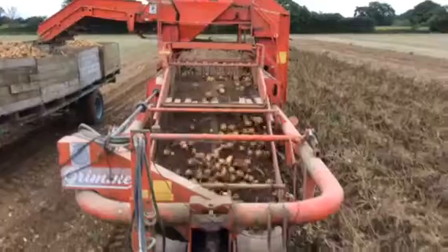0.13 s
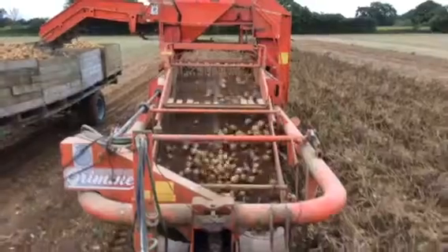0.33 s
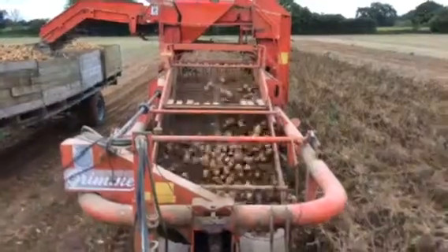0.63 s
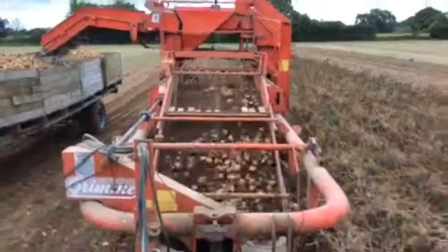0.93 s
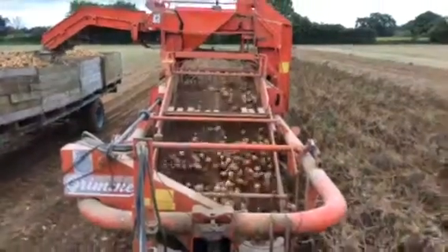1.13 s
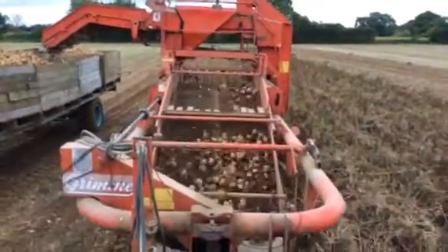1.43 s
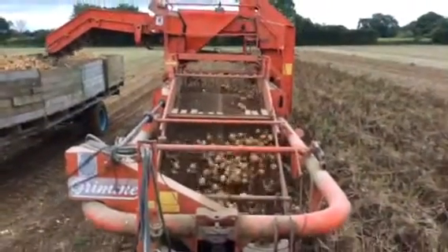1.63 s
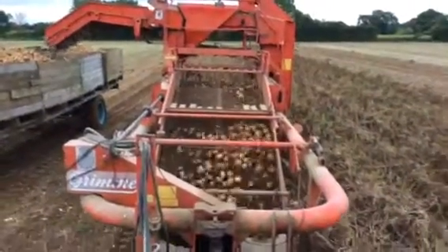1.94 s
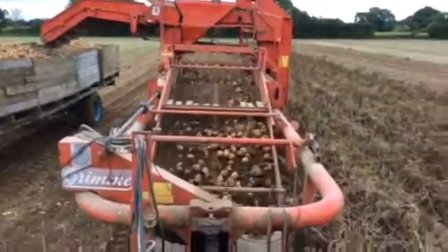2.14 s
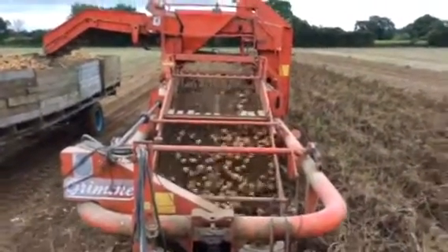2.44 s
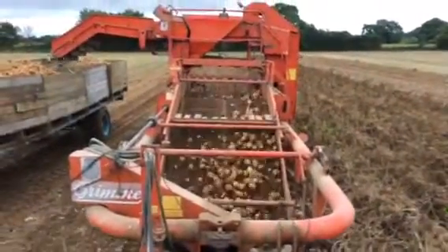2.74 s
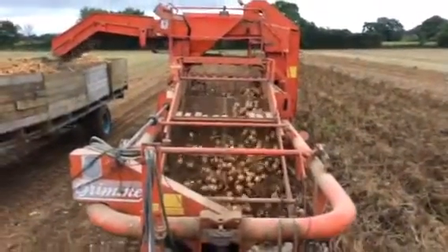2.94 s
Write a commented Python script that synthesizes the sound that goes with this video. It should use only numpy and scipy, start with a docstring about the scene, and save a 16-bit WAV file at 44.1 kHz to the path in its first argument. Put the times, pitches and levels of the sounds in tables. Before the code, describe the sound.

Potato harvester roaring steadily behind a tractor, with clattering stones, metallic clinks and soft thuds

```python
"""Potato harvester at work

A potato harvester behind a tractor works a field, heard from the tractor, abruptly after a short silence. The
diesel is a sum of firing orders beside a second engine's tone; gears are a clear sine and fuzzy tones, among
which a few blurred higher firing orders of the diesel also sound. Fans, webs and soil are shaped noise;
clinking links and clattering stones are noise bursts in resonances. Potatoes and clods thud as short low sine
pushes, over a patter and ticking of tiny decaying tones."""
import sys
import numpy as np
from scipy import signal
from scipy.fft import rfft, irfft
from scipy.io import wavfile
from scipy.ndimage import uniform_filter1d

SR = 44100
rng = np.random.default_rng(int(sys.argv[2]) if len(sys.argv) > 2 else 0)


def transcribe(signal):
    """Save signal, clipped to [-1, 1], as a 16-bit WAV file at the path in sys.argv[1]."""
    frames = np.atleast_2d(signal).T
    limited = np.clip(frames, -1, 1)
    pcm = np.round(limited * 32767).astype(np.int16)
    wavfile.write(sys.argv[1], SR, pcm)


def voltage_ratio(decibels):
    """Convert decibels (scalar or array-like) to amplitude ratios, 20 dB per decade."""
    exponent = np.asarray(decibels, float) / 20
    return 10 ** exponent


N = 136269


def evened(x):
    """Scales to rms 1."""
    return x / np.sqrt(np.mean(x ** 2) + 1e-20)


def add(mix, start_s, sound):
    """Mixes a sound in at start_s, cut at the end of the mix."""
    part = mix[round(start_s * SR):][:len(sound)]
    part += sound[:len(part)]


def along(table, column):
    """One column of a table, interpolated over the time column for every sample."""
    rows = np.array(table)
    return np.interp(np.arange(N) / SR, rows[:, 0], rows[:, column])


def sine(pitch_hz):
    """Sine of rms 1 that follows a pitch curve."""
    return np.sqrt(2) * np.sin(2 * np.pi * np.cumsum(pitch_hz) / SR)


def resonate(x, hz, width_hz):
    """One-pole resonance of gain 1: shifted down to 0 Hz, smoothed, shifted back."""
    turn = np.exp(2j * np.pi * hz * np.arange(len(x)) / SR)
    r = np.exp(-np.pi * width_hz / SR)
    return 2 * (turn * signal.lfilter([1 - r], [1, -r], x / turn)).real


def wander(top_hz):
    """Slow chance of rms 1: 16 sines of random phase up to top_hz, weaker as they get faster."""
    t = np.arange(N) / SR
    rates_hz = top_hz * np.geomspace(.05, 1, num=16)
    return evened(sum(np.sin(2 * np.pi * (f * t + rng.random())) / np.sqrt(f) for f in rates_hz))


def noise(spectrum, patchy_db, flicker_db):
    """Random short-time spectra with patches and a flicker shared by all bins, shaped, rms 1."""
    frames = N // 128 + 5
    a, b, patches = rng.standard_normal((frames, 257, 3)).T
    patches = uniform_filter1d(patches, size=10, axis=0)  # over bins
    patches = evened(uniform_filter1d(patches, size=14, axis=1))  # over frames
    flicker = evened(uniform_filter1d(rng.standard_normal(frames), size=5))
    bins = (a + 1j * b) * voltage_ratio(patchy_db * patches + flicker_db * flicker)
    x = signal.istft(bins, nperseg=512, noverlap=384)[1][:N]
    hz, db = np.transpose(spectrum)
    shape_db = np.interp(np.log(np.fft.rfftfreq(N, 1 / SR) + 1), np.log(hz + 1), db)
    return evened(irfft(rfft(x) * voltage_ratio(shape_db), N))


def diesel():
    """Firing orders in step, so that each firing is a pressure pulse."""
    firing_hz = 85.67
    # Each row: multiple of the firing rate, rms level in dB before load and wander.
    orders = [(1, -31), (2, -37), (3, -38.5), (4, -38.5)]
    # Engine load. Each row: time in seconds, level in dB added to all orders.
    load = [(.13, 1), (.6, 0), (1.0, -1), (1.4, -1), (1.8, 0), (2.3, 0), (2.7, 0), (3.09, -1.5)]
    turns = np.cumsum(firing_hz * (1 + 0.0021 * wander(3.02))) / SR + rng.random()
    out = np.zeros(N)
    for multiple, db in orders:
        level = np.sqrt(2) * voltage_ratio(db + along(load, column=1) + 1.2 * wander(16))
        out += level * np.cos(2 * np.pi * multiple * turns)
    return out


def other_engine():
    """Firing tone of the other tractor: one sine drifting in pitch and level."""
    # Each row: time in seconds, pitch in Hz, rms level in dB.
    neighbour = [(.13, 68.5, -36), (.6, 67.5, -40), (1.2, 68.6, -37), (1.8, 67.6, -40), (2.4, 68.16, -35),
                 (3.09, 68, -33)]
    return voltage_ratio(along(neighbour, column=2)) * sine(along(neighbour, column=1))


def gears():
    """One clear mesh tone, and fuzzy tones of noise through two equal resonances in series: gear drive tones
    and a few blurred diesel firing orders."""
    # Gear mesh. Each row: time in seconds, mean pitch in Hz, rms level in dB before wander.
    whine = [(0.13, 1477, -32), (0.47, 1484, -34), (0.66, 1485, -31), (1.23, 1474, -38.5),
             (1.28, 1473, -32.5), (1.96, 1478, -35.5), (2.0, 1473, -31.5), (2.9, 1475, -34),
             (3.09, 1471, -30)]
    # Pitches of the fuzzy tones, in Hz: 170, 257 and 513 are blurred firing orders of the diesel (2, 3 and 6
    # times the firing rate), the others gear drive tones.
    drone_hz = [135, 170, 257, 513, 565, 732, 774, 1018, 1140, 1184, 1255, 1318, 1382, 1476, 1776, 2109,
                2645]
    # One row per drone pitch: width of each resonance in Hz, rms level in dB.
    drones = [(35, -33.5), (25, -37.5), (7.6, -43), (13, -42.5), (7.4074, -51), (4.8, -45), (11.111, -44.5),
              (5.7, -60), (50, -39.5), (14, -38.5), (40, -39.5), (4.5, -51), (5.5, -42.5), (30, -41),
              (11, -45.5), (25, -52.5), (30, -52)]
    level = voltage_ratio(along(whine, column=2) + 0.69 * wander(25.87))
    out = level * sine(along(whine, column=1) + 2.21 * wander(20))
    for hz, (width_hz, db) in zip(drone_hz, drones):
        once = resonate(rng.standard_normal(N), hz, width_hz)
        out += voltage_ratio(db) * evened(resonate(once, hz, width_hz))
    return out


def roar():
    """Fans and webs roar evenly: nearly steady broadband noise."""
    # Each row: frequency in Hz, relative spectral level in dB per Hz.
    roar_spectrum = [(15, -50), (30, -5), (45, -7), (82, -9), (170, -2), (299, -8.5), (342, -5),
                     (414, -12.5), (604, -12), (1150, -8), (1360, -12.5), (1500, -8.5), (1780, -12.5),
                     (1980, -16), (2850, -17.5), (3050, -22.5), (6000, -25.5), (10000, -31), (15500, -36.5)]
    return voltage_ratio(-24.5) * noise(roar_spectrum, patchy_db=1.08, flicker_db=0.57)


def soil_hiss():
    """Soil hisses unevenly over the rods: patchy noise that swells and sinks."""
    # Each row: time in seconds, level in dB before share_db.
    shuffle = [(0.13, -28.5), (0.43, -45), (0.47, -34), (1.61, -40), (1.83, -31), (2.05, -39), (2.07, -37),
               (2.18, -37), (2.36, -47), (2.41, -28), (2.52, -41), (2.73, -30), (2.77, -34.5),
               (3.09, -36.5)]
    # Each row: frequency in Hz, relative spectral level in dB per Hz.
    hiss_spectrum = [(1500, -28), (3000, -1), (6000, 4.5), (10000, -1), (15500, -6), (17000, 1)]
    share_db = -6
    return voltage_ratio(along(shuffle, column=1) + share_db) * noise(hiss_spectrum, patchy_db=3.5, flicker_db=4.0)


def grains(per_s, lo_hz, hi_hz, cycles, spread_db):
    """Random little impacts as decaying sines of 16 pitches, rms 1; spread_db makes a few large."""
    size = voltage_ratio(spread_db * np.minimum(rng.exponential(1, N), 4)) * (rng.random(N) < per_s / SR)
    kind = rng.integers(0, 16, N)
    t = np.arange(2500) / SR
    out = np.zeros(N)
    for k, hz in enumerate(np.geomspace(lo_hz, hi_hz, num=16)):
        grain = np.sin(2 * np.pi * hz * t) * np.exp(-t * hz / cycles)
        out += signal.oaconvolve(size * (kind == k), grain)[:N]
    return evened(out)


def patter():
    """Low little impacts of one size."""
    return voltage_ratio(-36) * grains(per_s=200, lo_hz=302.7, hi_hz=2840, cycles=5, spread_db=0.0)


def ticks():
    """High little impacts, a few of them large."""
    return voltage_ratio(-49) * grains(per_s=290, lo_hz=3770, hi_hz=13700, cycles=6.5, spread_db=7.5)


def clinks():
    """Each clink is a ragged rattle of tiny blows that rings a link and jangles its neighbours."""
    # Link clinks, grouped from low links to high. Each row: start in seconds, ring peak in dB before trim_db,
    # pitch in Hz, rattle length in seconds before stretch, jangle peak in dB relative to the ring.
    links = [(0.9153, -27, 8890, 0.011, -8), (1.4282, -23.5, 8930, 0.009, -5),
             (1.8387, -28, 8960, 0.0066, -8), (1.8901, -28, 8770, 0.008, -4),
             (2.0747, -23, 8900, 0.0067, -3), (2.9552, -19.5, 8800, 0.0053, -16.5),
             (0.4334, -25, 10900, 0.009, -10), (0.6694, -20, 10800, 0.0066, -8),
             (0.7228, -25, 10850, 0.0067, -8), (0.9777, -23.5, 10760, 0.005, -2),
             (1.3404, -31, 9950, 0.008, -6), (1.6212, -25, 11020, 0.011, 1),
             (1.8043, -23, 10800, 0.0083, -5), (2.0522, -28, 11020, 0.008, -8),
             (2.0727, -26, 10800, 0.0072, 2), (2.1595, -27, 10800, 0.008, -8),
             (2.177, -29, 11700, 0.008, -8), (2.6409, -25, 11150, 0.008, -11),
             (2.6519, -24.5, 10860, 0.0074, -8), (2.8868, -32, 10900, 0.008, -8),
             (2.9108, -30, 10250, 0.0084, -8), (0.156, -22, 13400, 0.0072, -6),
             (0.253, -19.5, 13400, 0.011, -8), (0.4334, -28, 12800, 0.008, -8),
             (0.9098, -27, 13000, 0.008, -6), (1.073, -33, 12800, 0.008, -8),
             (1.2555, -25, 13500, 0.0071, -8), (1.5214, -22, 13200, 0.0066, -12),
             (1.6337, -28, 14000, 0.008, -8), (2.0512, -25, 13600, 0.008, -14),
             (2.176, -26, 13360, 0.0093, -8), (2.2593, -29, 13500, 0.008, -11.5),
             (2.6349, -21, 13600, 0.008, -8), (0.2379, -37, 15000, 0.008, -8),
             (0.2583, -28, 14600, 0.008, -5), (1.6352, -37, 15100, 0.008, -8),
             (2.0023, -38, 15200, 0.008, -8), (2.0514, -34, 15000, 0.008, -8),
             (2.2263, -30, 14900, 0.008, -8), (2.2593, -36, 15200, 0.008, -14),
             (2.5344, -38, 15160, 0.0095, -8)]
    ring_width_hz, jangle_width_hz, jangle_ratio = 150, 2000, 1.06
    trim_db, stretch, rise_s = -1.5, 1.3, 0.0011
    out, t = np.zeros(N), np.arange(3000) / SR
    for start_s, db, hz, length_s, jangle_db in links:
        blows, shake = rng.standard_normal((2, len(t)))
        ragged = voltage_ratio(2.4 * evened(uniform_filter1d(shake, size=90)))
        decay = np.exp(-(t / (length_s * stretch)) ** 0.98)
        rattle = blows * ragged * decay * np.minimum(t / rise_s, 1)
        ring = resonate(rattle, hz, ring_width_hz)
        jangle = resonate(rattle, hz * jangle_ratio, jangle_width_hz)
        clink = ring / abs(ring).max() + voltage_ratio(jangle_db) * jangle / abs(jangle).max()
        add(out, start_s, voltage_ratio(db + trim_db) * clink)
    return out


def knocks():
    """Stones on the rods: a noisy burst around its centre with a broad crack."""
    # Each row: start in seconds, peak in dB, centre in Hz, width in Hz, decay time in seconds.
    stones = [(.198, -18.5, 3570, 900, .012), (0.477, -20.5, 3700, 900, .012),
              (0.804, -21.5, 4000, 1500, 0.019), (1.089, -20, 7000, 3000, 0.0066),
              (1.274, -23.5, 3170, 160, 0.028), (1.733, -22.5, 4200, 1516, 0.009),
              (1.836, -24, 5300, 2000, 0.0066), (2.06, -21, 5960, 3500, .006),
              (2.098, -21.5, 7500, 1500, 0.016), (2.382, -29, 4500, 1500, .012),
              (2.426, -17, 7200, 2500, .008), (2.613, -21, 3300, 600, 0.014), (2.653, -25, 6500, 2500, .03),
              (2.68, -21.5, 5930, 900, 0.024), (2.711, -19, 5400, 1000, 0.022),
              (2.74, -21, 5760, 1200, 0.0079)]
    rise_s = 0.0024
    out, t = np.zeros(N), np.arange(5000) / SR
    for start_s, db, hz, width_hz, decay_s in stones:
        shake = rng.standard_normal(len(t))
        body = evened(resonate(shake, hz, width_hz))
        crack = .5 * evened(resonate(shake, 4000, 4600))
        burst = (body + crack) * np.exp(-t / decay_s) * np.minimum(t / rise_s, 1)
        add(out, start_s, voltage_ratio(db) * burst / abs(burst).max())
    return out


def thuds():
    """Potatoes and clods dropping: a soft low push that dies fast."""
    # Each row: start in seconds, envelope peak in dB, pitch in Hz.
    drops = [(.525, -20, 84), (0.774, -18, 176.2), (1.18, -18, 87), (1.209, -21, 169), (1.292, -25, 155),
             (1.344, -37, 156.7), (1.459, -18.5, 89), (1.505, -23.5, 173), (1.681, -19, 88),
             (1.955, -20, 94.4), (2.176, -23, 170.6), (2.575, -29, 85), (2.635, -20, 168.6),
             (2.95, -26, 84)]
    peak_s = .013
    out, t = np.zeros(N), np.arange(8000) / SR
    push = np.e * t / peak_s * np.exp(-t / peak_s)
    for start_s, db, hz in drops:
        add(out, start_s, voltage_ratio(db) * push * np.sin(2 * np.pi * hz * t))
    return out


def scene():
    """All sources at one microphone."""
    engines = diesel() + other_engine()
    beds = gears() + roar() + soil_hiss() + patter() + ticks()
    return (engines + beds + clinks() + knocks() + thuds())[None]


def low_pass(x):
    """Removes everything above the highest recorded frequency."""
    return signal.sosfilt(signal.butter(12, 16480, fs=SR, output="sos"), x)


def record(dry):
    """Band limits at 40 Hz and 15.4 kHz, and silence until an abrupt start."""
    start_s, rise_s = .1205, 0.00027
    lowpass = signal.firwin(511, 15400, window=("kaiser", 9), fs=SR)
    band = signal.oaconvolve(dry, lowpass[None], "same")
    band = signal.sosfilt(signal.butter(2, 40, "high", fs=SR, output="sos"), band)
    gate = np.clip((np.arange(N) / SR - start_s) / rise_s, 0, 1)
    return low_pass(band * gate)


dry = scene()
out = record(dry)
transcribe(out)
```